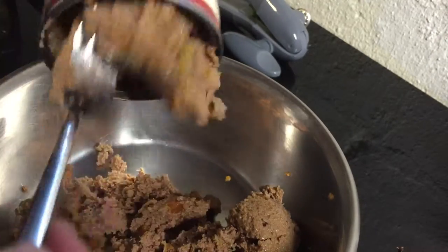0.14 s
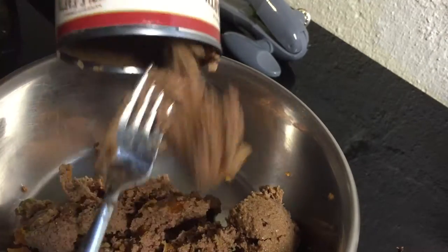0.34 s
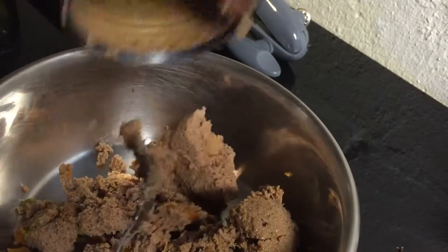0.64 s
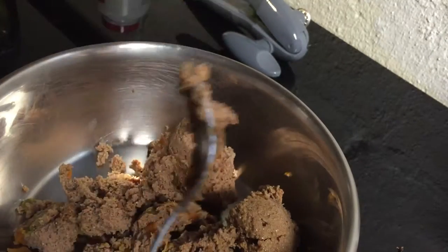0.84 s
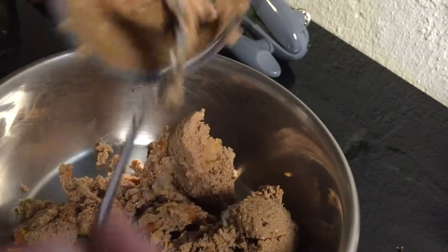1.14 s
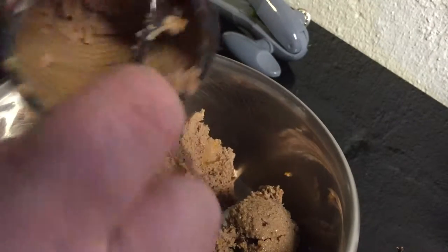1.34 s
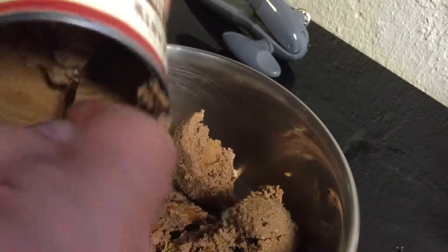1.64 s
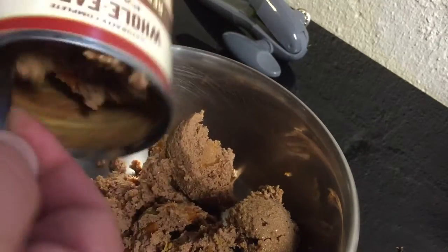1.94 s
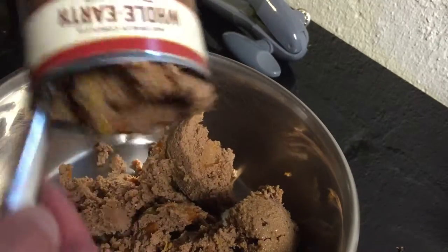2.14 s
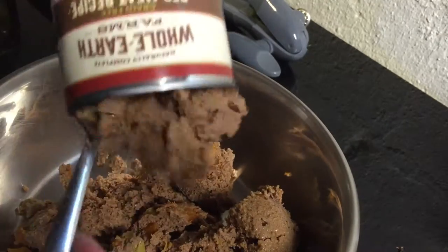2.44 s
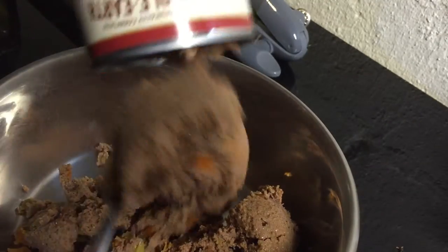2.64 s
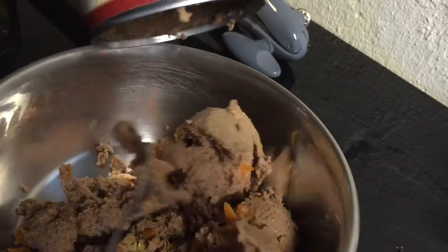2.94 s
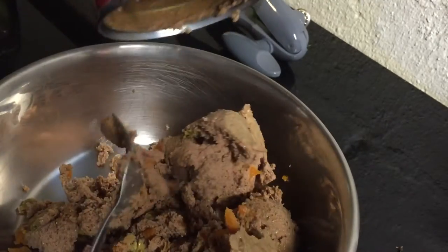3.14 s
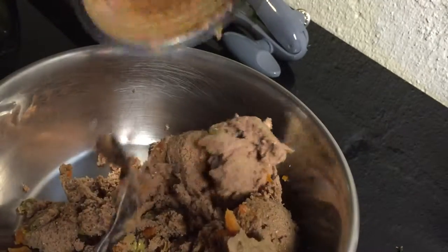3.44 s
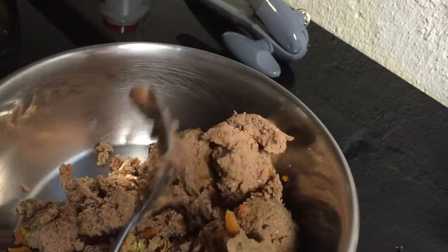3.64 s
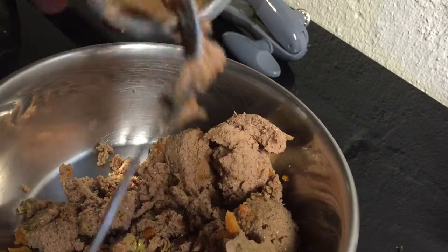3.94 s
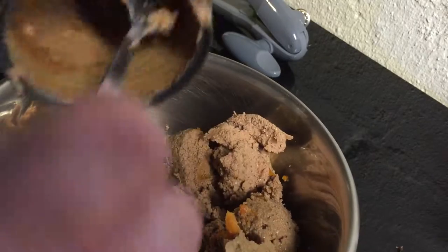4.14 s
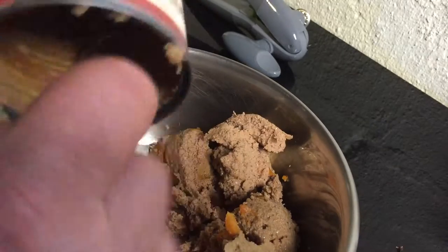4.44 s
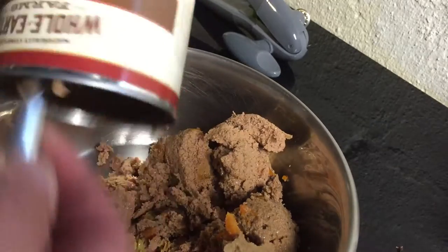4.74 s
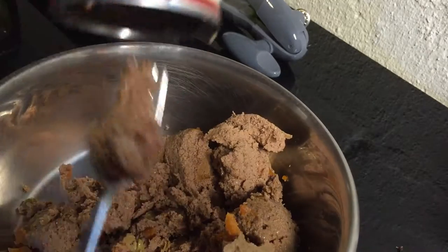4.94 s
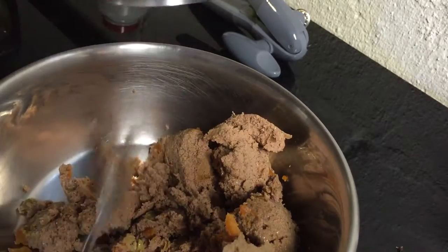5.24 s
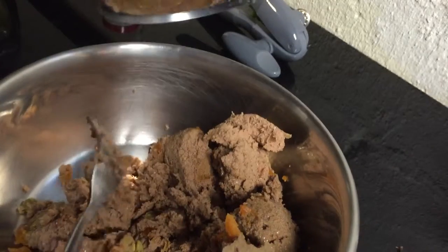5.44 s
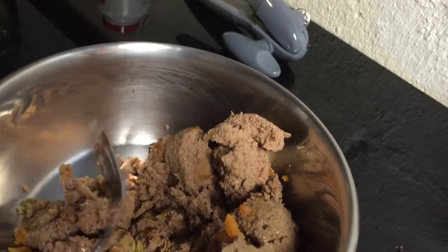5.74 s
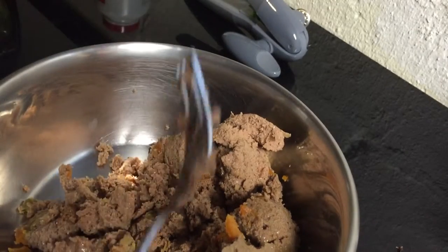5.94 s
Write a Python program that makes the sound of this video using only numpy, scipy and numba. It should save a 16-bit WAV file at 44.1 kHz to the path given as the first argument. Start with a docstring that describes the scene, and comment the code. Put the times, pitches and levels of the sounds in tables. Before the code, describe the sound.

Wet crackling food and scratchy fork scrapes in a thin can, quiet pauses between, ending in three loud metallic clinks on a bowl.

```python
"""A fork digs wet pet food out of a tin can: stick-slip grains and knocks excite damped modes of the
ribbed can wall, and broader resonances rasp. The food crackles and smacks as short bursts of filtered
noise, and dull low notes thump. Late on, three taps on a steel bowl ring a set of decaying sines with
a clatter of noise. Faint gliding tones, a low rumble and a thin hiss fill the quiet kitchen."""
import sys
import numpy as np
from scipy import signal
from scipy.fft import rfft, irfft
from scipy.io import wavfile
from scipy.ndimage import uniform_filter1d
from numba import njit

SR = 44100
rng = np.random.default_rng(int(sys.argv[2]) if len(sys.argv) > 2 else 0)


def persist_wave(psi):
    """Save psi, clipped to +-1, as 16-bit WAV."""
    counts = np.round(np.clip(psi, -1, 1) * 32767).astype(np.int16)
    wavfile.write(sys.argv[1], SR, np.atleast_2d(counts).T)


N = 268128


def undb(db):
    """Logarithmic level: 20 dB are a factor of ten in amplitude."""
    return 10 ** (np.asarray(db, float) / 20)


def unit(x):
    """Normalisation: scale a signal to rms 1."""
    return x / np.sqrt(np.mean(x ** 2))


def ring(x, hz, t60):
    """Damped resonance: one complex pole turns an impulse of 1 into a decaying sine."""
    pole = np.exp(2j * np.pi * hz / SR - np.log(1000) / (t60 * SR))
    return signal.lfilter([1], [1, -pole], x).imag


@njit
def bend(x, hz, t60):
    """Time-varying resonance: the angle of the pole follows a pitch given for every sample."""
    y, state = np.empty(len(x)), 0j
    for i in range(len(x)):
        pole = np.exp(2j * np.pi * hz[i] / SR - np.log(1000.) / (t60 * SR))
        state = state * pole + x[i] + 1e-18
        y[i] = state.imag
    return y


def shape(x, points):
    """Spectral colouring: weight the spectrum by (Hz, dB) points joined over log frequency."""
    hz, db = np.transpose(points)
    log_hz = np.log(np.arange(len(x) // 2 + 1) * SR / len(x) + 1)
    return irfft(rfft(x) * undb(np.interp(log_hz, np.log(hz), db)), len(x))


def band_pass(x, low_hz, high_hz):
    """Band limitation: a Butterworth filter keeps one band."""
    return signal.sosfilt(signal.butter(2, [low_hz, high_hz], "band", fs=SR, output="sos"), x)


def high_pass(x, hz):
    """High-pass filtering: a Butterworth filter weakens what lies below a corner."""
    return signal.sosfilt(signal.butter(2, hz, "high", fs=SR, output="sos"), x)


def gain(table, column):
    """Envelope: gain over time from one dB column of a table, -150 dB outside its times."""
    rows = np.array(table)
    return undb(np.interp(np.arange(N) / SR, rows[:, 0], rows[:, column], left=-150, right=-150))


def walk(rate):
    """Slow random modulation: normal draws, rate per second, smoothed by two moving averages."""
    k = int(SR / rate)
    steps = np.repeat(rng.standard_normal(N // k + 1), k)
    return 0.8 * uniform_filter1d(uniform_filter1d(steps, k), k)[:N]


def grains(rate, scatter_db, bed):
    """Stick-slip friction: random clicks (rate per second) of uneven size over a bed of noise."""
    happens = rng.random(N) < rate / SR
    size = undb(scatter_db * rng.exponential(size=N).clip(0, 4))
    clicks = happens * size * rng.standard_normal(N)
    return unit(unit(clicks) + bed * rng.standard_normal(N))


def grip():
    """Mode loading: pitch and levels of the can, eased from one scoop's grip to the next."""
    # how hand and food load the can: start_s, second_mode_hz, wet_crackle_db (against the rasp),
    # then mode_1_db to mode_6_db
    grips = [(0, 594, 1, -24, -38, 0.5, -20.5, -15.5, -24), (1.46, 624, -3.5, -8.5, -11, 1, -7.5, -10, -22),
             (1.62, 627, -2, -14.5, 0, -12, -3.5, -26, -14),
             (2.13, 662.7, -3, 1, -3, -16, -15.5, -10.5, -30),
             (2.63, 620, 5, -12, -1.5, -22, -15.5, -36, -39), (3.3, 660, -7, -4.5, -7, -4, -10.5, -20, -22),
             (4.1, 620, 1.5, -10.5, 0, -31.5, -29, -19.5, -19.5),
             (4.378, 632, -1, -34, 0.5, -21, -4, -19, -7), (4.8, 612, -6.5, -15, -5.5, -4, -5.5, -0.5, -12),
             (5.16, 615, -8, -23.5, -18, -10, -1, -8, -18)]
    rows = np.array(grips)
    now = np.searchsorted(rows[:, 0], np.arange(N) / SR, side="right").clip(1) - 1
    return uniform_filter1d(rows[now, 1:].T, size=800)


def contact():
    """Contact envelopes: gains of ringing, rasp and wet crackle from long scrapes and light touches."""
    # three long scrapes along the wall, each with its rows of: time_s, ringing_db, rasp_db
    scrapes = [
        [(1.47, -89, -69.5), (1.52, -52.5, -53), (1.534, -36.5, -51), (1.56, -43, -55), (1.568, -41.5, -51),
         (1.606, -50.5, -47.5), (1.698, -53, -61), (1.816, -42, -46), (1.874, -52, -55.5), (1.946, -45, -52.5),
         (1.962, -62, -56), (2.018, -60.5, -47), (2.062, -57, -50), (2.125, -80, -73)],
        [(2.13, -77, -66), (2.144, -68, -62.5), (2.298, -41.5, -53), (2.31, -43, -64), (2.324, -52, -71),
         (2.34, -58, -69), (2.358, -44, -48), (2.384, -44, -56), (2.406, -54, -67), (2.442, -51, -57.5),
         (2.458, -37.5, -54), (2.53, -49, -54), (2.546, -63.5, -68), (2.62, -83, -74)],
        [(4.2, -98, -82), (4.244, -43, -67), (4.32, -48, -61), (4.34, -37, -57.5), (4.378, -38, -50),
         (4.384, -28, -43.5), (4.404, -40.5, -69.5), (4.432, -42.5, -54), (4.594, -47, -49.5),
         (4.764, -40.5, -45.5), (4.806, -53, -66.5), (4.81, -43, -39), (4.954, -69.5, -86), (5.14, -82, -86)],
    ]
    # light touches of fork and food: peak_s, rise_s, fall_t60_s, ringing_db, rasp_db, wet_crackle_db
    touches = [(0.02, 0.06, 0.29, -66, -64.5, -60.5), (0.085, 0.079, 0.64, -76, -76, -61),
               (0.38, 0.083, 0.22, -95, -92, -71.5), (0.486, 0.013, 0.18, -90, -85, -56),
               (0.594, 0.011, .15, -101, -86, -69), (1.342, 0.044, 0.18, -100, -87, -60),
               (1.43, .03, .3, -95, -89, -63), (2.652, 0.029, 0.42, -69, -69.5, -64),
               (2.75, 0.028, 0.28, -76, -75.5, -81), (2.882, 0.058, 0.49, -59, -76, -64.5),
               (2.97, 0.09, 0.1, -83, -85, -69.5), (3.1, 0.17, 0.21, -74.5, -67, -75),
               (3.18, 0.15, 0.17, -96, -99, -70), (3.31, 0.023, 0.061, -92, -94, -70),
               (3.487, 0.13, 0.47, -63.5, -74.5, -81.5), (4.156, 0.012, 0.12, -87, -57, -61.5),
               (5.25, 0.053, 0.38, -59.5, -59.5, -96)]
    t = np.arange(N) / SR
    ringing = sum(gain(scrape, 1) for scrape in scrapes)
    rasp = sum(gain(scrape, 2) for scrape in scrapes)
    out = np.array([ringing, rasp, rasp * undb(grip()[1])])
    for s, rise, t60, *db in touches:
        rising = np.clip(1 + (t - s) / rise, 0, 1) ** 2
        falling = 1000 ** (-np.abs(t - s) / t60)
        out += undb(db)[:, None] * np.where(t < s, rising, falling)
    return out


def room():
    """Band-limited noise: two wavering humps of rumble near 62 and 128 Hz over a thin hiss."""
    # level of the lower hump: time_s, rms_db
    rumble_level = [(0.0, -60.5), (0.66, -61), (1.01, -68.5), (1.35, -67.5), (1.69, -59), (1.88, -65.5),
                    (2.5, -60), (2.64, -62.5), (3.1, -58), (3.61, -59.5), (3.73, -62), (4.37, -58),
                    (4.74, -61.5), (4.89, -69), (5.15, -62.5), (5.28, -61), (5.76, -58.5), (6.08, -60.5)]
    # colour of the hiss: frequency_hz, density_db (per Hz)
    hiss_colour = [(120, -36), (200, -2.5), (777, -21), (1230, -19.5), (2020, -22), (12800, -30),
                   (16000, -28.5)]
    # slow rise and fall of the hiss: time_s, level_db (against its base level)
    hiss_level = [(0, 4.5), (1.1, 5), (3.3, 6.5), (3.9, 5.5), (5.1, 6.5), (5.4, 14), (6.09, 8.5)]
    low = shape(rng.standard_normal(N), [(12, -60), (30, -53.0), (48, 29), (62, 39.0), (88, 35.5),
                                         (110, -34), (400, -70), (2000, -120)])
    high = shape(rng.standard_normal(N), [(30, -71.5), (80, -15.0), (128, 7.5), (190, -8.5), (300, -24.5),
                                          (500, -41.0), (1000, -34.5), (3000, -90.5), (8000, -130)])
    low_hump = unit(low * undb(1.5 * walk(3.9)))
    high_hump = undb(-3.5) * unit(high * undb(1.0 * walk(5.3)))
    rumble = gain(rumble_level, 1) * (low_hump + high_hump)
    hiss = high_pass(shape(rng.standard_normal(N), hiss_colour), 200)
    return rumble + undb(-79.5) * gain(hiss_level, 1) * unit(hiss)  # base level of the hiss in dB


def food(patchy_db=1.4):
    """Granular noise: a crackle of tiny wet pops of shifting colour, and single louder smacks."""
    # colour of the crackle: frequency_hz, density_db (per Hz)
    wet_colour = [(1470, -18.5), (2500, -16), (3110, -5), (3860, -7), (4550, -4.5), (10400, -8.5),
                  (14500, -14), (15400, -27), (16000, -31)]
    # shifting slope of that colour: time_s, tilt_db (per octave, about 6 kHz)
    wet_tilt = [(0, 2.5), (1.4, -1), (2.1, 0.5), (2.6, 0), (2.95, 5.5), (3.5, 6.5), (4.2, 1.5), (4.6, -3.5),
                (5, 0.5)]
    # single smacks: start_s, peak_db, centre_hz
    smacks = [(0.0104, -45, 8920), (0.051, -48, 5170), (0.0656, -35.5, 3130), (0.08, -34.5, 2700),
              (0.104, -48, 4300), (0.113, -43, 4520), (0.1334, -42.5, 4480), (0.165, -51, 9900),
              (0.187, -52, 9350), (0.2326, -50, 9200), (0.2587, -61, 4150), (0.295, -62, 5430),
              (0.3725, -47.5, 5930), (0.489, -58, 5900), (0.493, -52, 9000), (0.52, -49, 9200),
              (0.5946, -49, 5240), (0.617, -54, 5300), (1.3357, -40, 3640), (1.4178, -47, 9400),
              (1.4424, -44, 11400), (1.775, -30.5, 8100), (1.938, -39, 3200), (2.0053, -29.5, 3100),
              (2.1355, -48, 3270), (2.1643, -38, 3300), (2.2043, -39, 2780), (2.2447, -32.5, 3060),
              (2.5206, -36.5, 2970), (2.55, -43, 3900), (2.598, -48, 12100), (2.6528, -45, 9000),
              (2.678, -49.5, 12200), (2.747, -45, 10900), (2.863, -52, 11100), (2.8894, -51, 6500),
              (2.9306, -59, 6350), (3.046, -48, 9500), (3.099, -58, 2960), (3.31, -66, 2930),
              (3.4794, -57, 11400), (4.161, -37, 5060), (4.309, -42, 5040), (4.526, -30, 3500),
              (4.785, -33, 2920), (4.8132, -24, 4700), (4.8443, -25.5, 3640), (6.0636, -30.5, 3500)]
    pops = grains(rate=900., scatter_db=4.0, bed=1.0) * undb(3.0 * walk(50.))
    crackle = shape(pops, wet_colour)
    tilt_db = np.interp(np.arange(N) / SR, *np.transpose(wet_tilt))
    bands = np.zeros(N)
    for hz in 2000 * 2 ** np.arange(0, 3, .25):  # quarter-octave steps
        band_db = patchy_db * walk(35.) + tilt_db * np.log2(hz / 6000)
        bands += undb(band_db) * band_pass(crackle, hz, hz * 2 ** 0.23)
    out = contact()[2] * unit(bands)

    t = np.arange(900) / SR
    decay = np.exp(-t / 0.00093) + 0.16 * np.exp(-t / 0.0085)  # a fast fall, then a weak slower one
    for s, db, hz in smacks:
        noise = rng.standard_normal(len(t))
        resonance = unit(ring(noise, hz, 10. / hz))  # t60 of ten cycles
        smack = (resonance + .5 * np.diff(noise, prepend=0)) * decay
        i = int(s * SR)
        out[i:i + len(t)] += (undb(db) * smack / np.abs(smack).max())[:N - i]
    return out


def can(crack_db=-13.0, wander=0.0094, patchy_db=9.5, skid=0.071):
    """Modal excitation: knocks ring all the can modes, dragging rings the lower four and rasps the wall."""
    # modes of the can: frequency_hz, t60_s
    can_modes = [(452, 0.036), (628, 0.052), (1045, 0.011), (1535, 0.04), (2300, 0.053), (3450, 0.016)]
    # tines knocking on the can: time_s, strike_db, tilt_db (hardness: slope per octave, about 1 kHz)
    knocks = [(0.054, -55, 8), (0.067, -40, -8), (0.08, -35.5, 0.5), (0.514, -53, -4), (1.5, -53, 1),
              (1.53, -24.5, 2), (1.568, -34, -6), (1.798, -42.5, -4.5), (1.814, -40.5, 9.5),
              (2.272, -45.5, -4.5), (2.294, -37, -2), (2.423, -40, 0), (2.445, -32, -1), (2.671, -55.5, 0),
              (2.908, -54, -7.5), (3.089, -52, 5.5), (4.157, -52.5, 8), (4.239, -41.5, -4.5),
              (4.258, -37.5, -1), (4.332, -36.5, -2), (4.352, -33.5, -2), (4.367, -38.5, -10),
              (4.383, -19.5, 2), (4.42, -45, 8), (4.462, -50.5, 11.5), (4.679, -32, 1.5), (4.811, -34, -8),
              (4.842, -41, -3)]
    # thin-wall resonances: frequency_hz, width_hz, level_db (before weighting by the root of the width)
    wall = [(960, 18, -19), (1370, 44, -9), (1980, 14.5, -13), (2615, 15, -1), (2855, 160, 3),
            (3157, 28, 8), (4370, 95, 1.5), (4600, 88, -23), (6060, 190, -7.5), (6740, 190, -3.5),
            (7100, 84, -21.5), (7360, 600, -21)]
    s, strike_db, tilt_db = np.transpose(knocks)
    at = (s * SR).astype(int)
    slips = grains(rate=700., scatter_db=4.5, bed=1.26)
    grip_hz, _, *mode_db = grip()
    ringing, rasping, _ = contact()
    pitches = [hz * (1 + wander * walk(6.9)) for hz, _ in can_modes]  # grip and fork pressure detune the wall
    pitches[1] *= grip_hz / can_modes[1][0]
    chatter = rng.standard_normal(900) * np.exp(-np.arange(900) / (0.0054 * SR))
    out = np.zeros(N)
    for k, (hz, (rest_hz, t60)) in enumerate(zip(pitches, can_modes)):
        blows = np.zeros(N)
        blows[at] = undb(strike_db + mode_db[k][at] + tilt_db * np.log2(rest_hz / 1000))
        # the tine skids on for a moment, so a rough push follows the blow
        push = skid * signal.oaconvolve(blows, chatter)[:N]
        out += bend(blows + push, hz, t60)
        if k < 4:
            rub = slips * undb(2.5 * walk(45.))
            main = unit(bend(bend(rub, hz, 1.74 * t60), hz, 0.69 * t60))
            partner = 0.26 * unit(bend(rub, 1.3 * hz, t60))  # a weaker resonance 30 % higher
            out += ringing * undb(mode_db[k]) * unit(main + partner)

    rasp = np.zeros(N)
    for hz, width, db in wall:
        # each resonance swells and fades alone as the tines pass nearer to or further from its belly
        swell = undb(db + patchy_db * walk(16.))
        t60 = np.log(1000) / np.pi / max(width, 60)  # a wider resonance dies sooner
        moving_hz = hz * (1 + wander * walk(7.))
        rasp += swell * unit(bend(slips, moving_hz, t60)) * width ** .5
    broad = shape(slips * undb(9.1 * walk(45.)),
                  [(250, -88.5), (800, 14.5), (2500, 26.5), (5000, 17.5), (8000, -43)])
    out += rasping * unit(unit(rasp) + 1.33 * unit(broad))

    cracks = np.zeros(N)
    cracks[at] = blows[at] * undb(crack_db)  # in proportion to the blow on the top mode
    burst = rng.standard_normal(400) * np.exp(-np.arange(400) / (0.0024 * SR))
    out += signal.oaconvolve(cracks, burst)[:N]
    return high_pass(out, 330)  # takes out the low leakage of the resonators


def tones():
    """Frequency glide: the phase of each faint far-off sine sums a pitch moving in a straight line."""
    # faint tones: start_s, length_s, start_hz, end_hz, rms_db
    glides = [(0.715, 0.15, 402, 377, -70), (.78, .12, 1480, 1540, -87), (3.642, 0.066, 633, 593, -71.5),
              (3.66, 0.15, 1256, 1176, -76.5), (4.009, 0.055, 950, 1020, -79),
              (4.014, .06, 585, 640, -76.5)]
    out = np.zeros(N)
    for s, length, from_hz, to_hz, db in glides:
        n, i = int(length * SR), int(s * SR)
        phase = 2 * np.pi * np.cumsum(np.linspace(from_hz, to_hz, n)) / SR
        out[i:i + n] += 2 * undb(db) * np.hanning(n) ** .5 * np.sin(phase)
    return out


def plops():
    """Forced resonance: a short rough push rings a dull low note."""
    # food landing and the fork jolting the can: start_s, peak_db, pitch_hz
    thumps = [(1.525, -41, 240), (4.229, -47.5, 203), (4.376, -43, 215), (2.665, -54, 149),
              (2.709, -60.5, 168), (3.044, -55, 260), (3.075, -58, 141), (3.108, -61, 293),
              (3.419, -57.5, 347), (3.629, -51.5, 160), (5.12, -55.5, 199)]
    t60_s = .12
    out = np.zeros(N)
    push = np.hanning(700)
    for s, db, hz in thumps:
        rough_push = np.pad(push * rng.standard_normal(len(push)), (0, 9000))
        note = ring(rough_push, hz, t60_s)
        i = int(s * SR)
        out[i:i + len(note)] += undb(db) * note / np.abs(note).max()
    return out


def taps(rise=0.00084, hold=0.0049, crack_t60=0.03, tail_db=-3.5, carry=0.23, waver_db=3.5):
    """Modal superposition: each tap partly chokes the last ring, then starts bowl, fork, thud and clatter."""
    # taps on the bowl: start_s, clatter_db, thud_db
    strikes = [(5.3505, -13, -20), (5.6118, -12.5, -21), (5.757, -12.5, -21)]
    # frequencies of the bowl modes: frequency_hz
    bowl_hz = [806, 1334, 1683, 2022, 2456.3, 2458.8, 2913, 3322, 3575, 3611, 3709, 3731, 3759, 4000, 4301,
               4635, 4958, 5062, 5647, 5722, 6013, 6352, 6406, 6680, 6812, 6907, 7174, 7500, 8231, 8581]
    # bowl modes in the same order: t60_s, tap_1_db, tap_2_db, tap_3_db (each tap lands on another spot)
    bowl_modes = [(1.15, -53.5, -51, -52.5), (0.8, -50.5, -52, -47), (1.56, -40.5, -51, -50.5),
                  (0.91, -43.5, -64.5, -51.5), (2.2, -36.5, -52, -63), (6.2, -37.5, -52, -45.5),
                  (3.7, -51, -52, -65.5), (1.1, -44.5, -60.5, -53), (0.58, -32.5, -36, -42.5),
                  (2.5, -40.5, -38, -41.5), (1, -40.5, -39.5, -41.5), (0.34, -36.5, -43, -31.5),
                  (0.34, -34.5, -32.5, -31.5), (3.3, -55, -52.5, -61.5), (0.28, -36.5, -44, -34.5),
                  (2.4, -66, -66.5, -68.5), (0.69, -38.5, -64, -57), (0.21, -24.5, -37, -32.5),
                  (0.15, -54, -50, -42), (0.17, -46, -46, -24), (0.31, -35, -32, -30.5),
                  (0.2, -39, -45, -23), (0.48, -53, -57, -43), (0.2, -45, -46.5, -31),
                  (0.74, -49.5, -43.5, -59), (0.24, -44, -43, -48), (0.23, -45, -48, -52),
                  (0.17, -48, -46.5, -35), (0.12, -22, -20.5, -18), (0.27, -37.5, -39, -37.5)]
    # fork modes, soon damped by hand and food: frequency_hz, t60_s, tap_1_db, tap_2_db, tap_3_db
    fork_modes = [(2417, 0.02, -10.5, -14, -11.5), (3742, 0.033, -16, -12, -15),
                  (5065, 0.038, -11.5, -42, -6.5), (6010, 0.054, -16, -8, -5.5),
                  (6900, 0.064, -34.5, -37, -38), (7140, 0.071, -40, -32, -17),
                  (9020, 0.044, -11.5, -15.5, -12.5), (10800, .06, -32, -47, -37.5)]
    # the loaded bowl jolting on the counter: frequency_hz, t60_s, level_db (added to the tap's thud_db)
    thud_modes = [(61, 0.41, -18.5), (123, 0.062, -4), (182.4, 0.14, -5), (224, 0.13, -9.5),
                  (736, 0.038, 3)]
    # colour of the clatter: frequency_hz, density_db (per Hz)
    clatter_colour = [(150, -30), (250, -14), (452, -21), (788, -14), (1260, -23), (3770, -15.5),
                      (4260, -19), (5730, -12), (6140, -2), (7440, -14.5), (9170, -14), (14700, -26),
                      (16000, -39)]
    # room tail of the clatter: frequency_hz, t60_s
    clatter_tail = [(250, 0.3), (1000, 0.24), (4000, 0.23), (7000, 0.16), (10000, 0.13), (16000, 0.2)]
    tail_hz, tail_t60 = np.transpose(clatter_tail)
    out = np.zeros(N)
    for k, (s, clatter_db, thud_db) in enumerate(strikes):
        i = int(s * SR)
        t = np.arange(N - i) / SR
        out[i:] *= carry + (1 - carry) * np.exp(-t / .003)
        onset = 1 - np.exp(-t / rise)
        tap = np.zeros(len(t))
        for hz, (t60, *db) in zip(bowl_hz, bowl_modes):  # close pairs beat
            level = undb(db[k] + waver_db * walk(13.0)[i:])  # the rocking bowl makes each mode waver
            tap += level * np.sin(2 * np.pi * hz * t) * 1000 ** (-t / t60)
        for hz, t60, *db in fork_modes:
            tap += undb(db[k]) * np.sin(2 * np.pi * (hz * t + rng.random())) * 1000 ** (-t / t60)
        for hz, t60, db in thud_modes:
            tap += undb(db + thud_db) * np.sin(2 * np.pi * hz * t) * 1000 ** (-t / t60)
        clatter = unit(shape(rng.standard_normal(len(t)), clatter_colour))
        after = np.maximum(t - hold, 0)  # the fork chatters on the steel before it lifts
        tap += undb(clatter_db) * clatter * 1000 ** (-after / crack_t60)
        for hz in 250 * 2 ** np.arange(0, 6, .5):  # half-octave bands
            t60 = np.interp(np.log(hz), np.log(tail_hz), tail_t60)
            band = band_pass(clatter[::-1], hz, hz * 2 ** .5)
            tap += undb(clatter_db + tail_db) * band * 1000 ** (-t / t60)
        out[i:] += onset * tap
    return out


def scene():
    """Linear superposition: the pressures of all sources add at one microphone."""
    return (taps() + can() + food() + plops() + tones() + room())[None]


def record(dry):
    """Saturation and band limit: tanh rounds the loudest peaks, an elliptic low-pass cuts the top."""
    top_hz = 15500
    rounded = .7 * np.tanh(dry / .7)
    return signal.sosfilt(signal.ellip(8, .2, 70, top_hz, fs=SR, output="sos"), rounded)


dry = scene()
out = record(dry)
persist_wave(out)
```